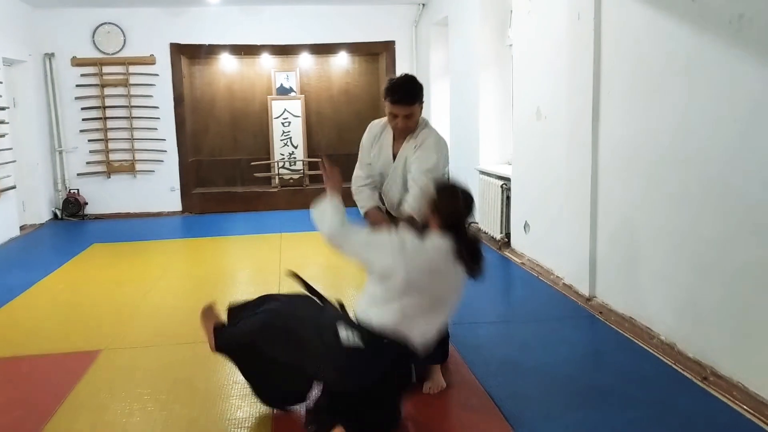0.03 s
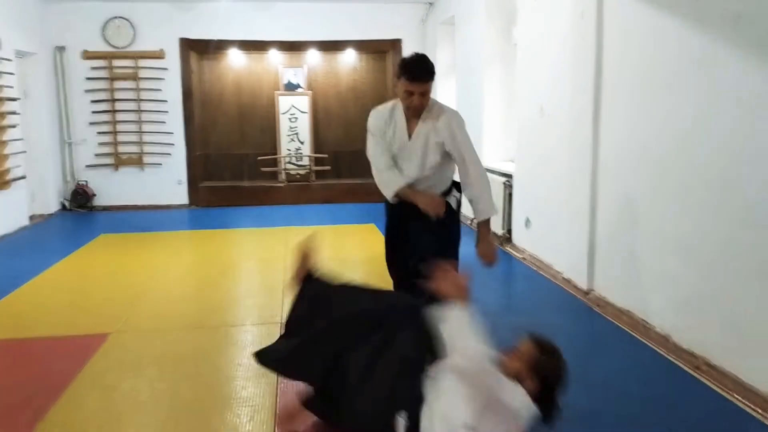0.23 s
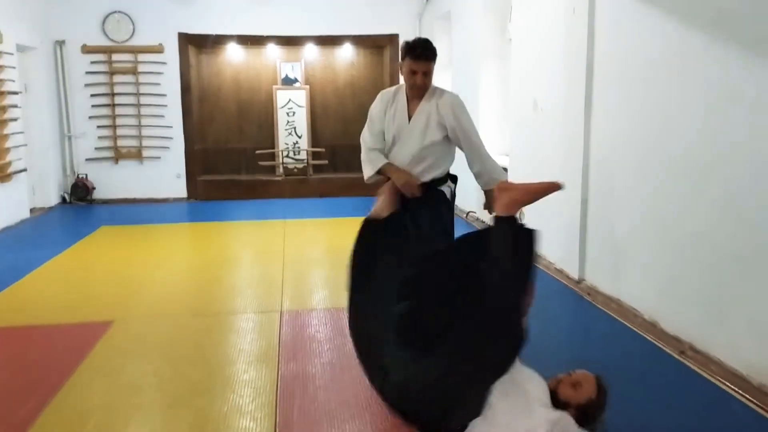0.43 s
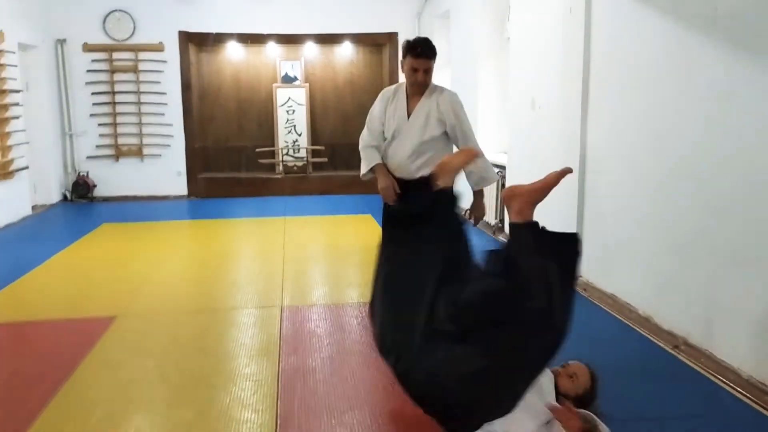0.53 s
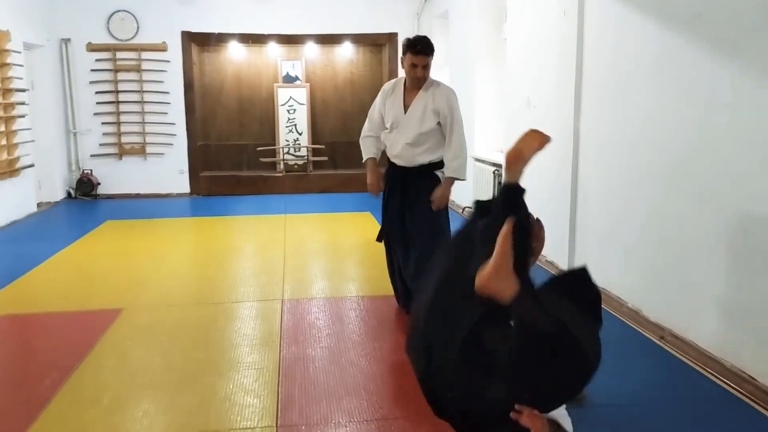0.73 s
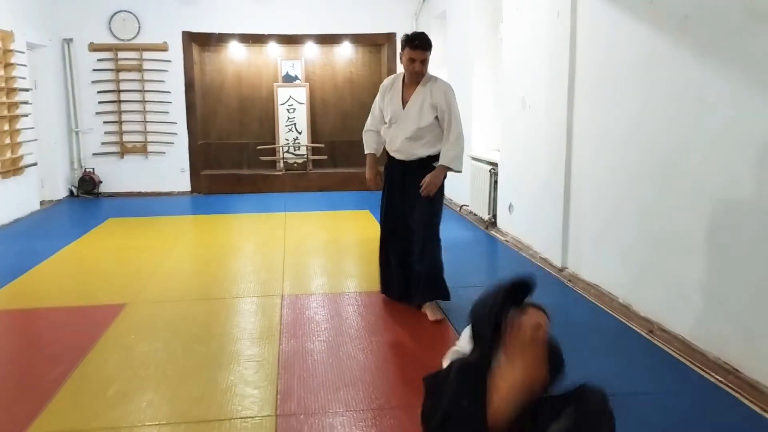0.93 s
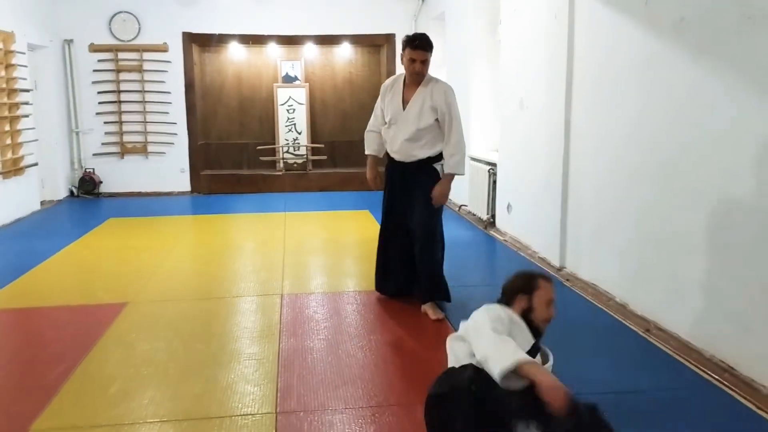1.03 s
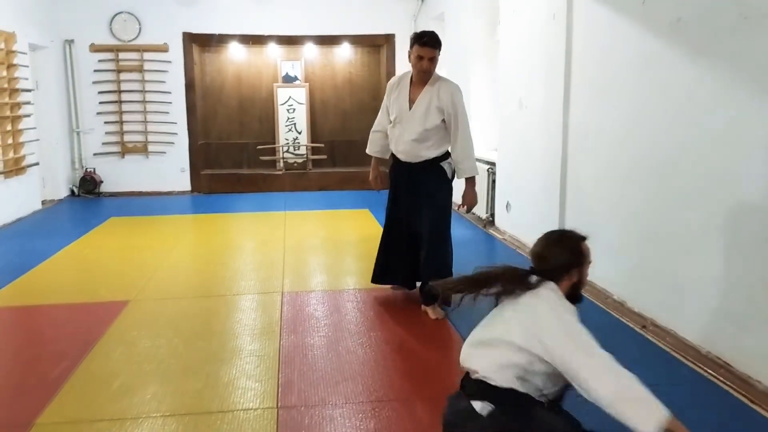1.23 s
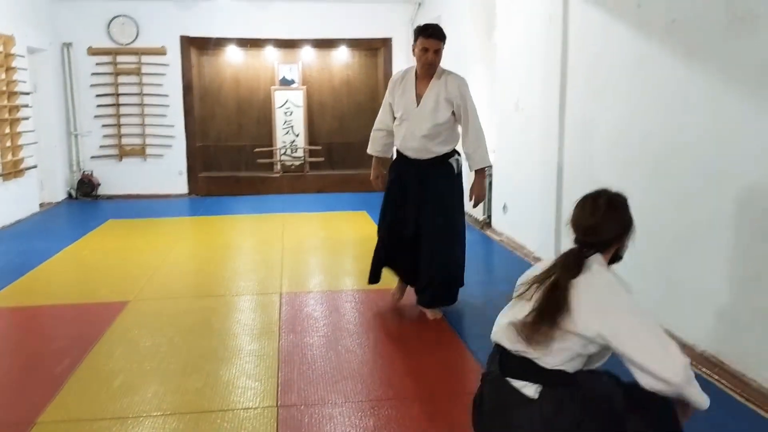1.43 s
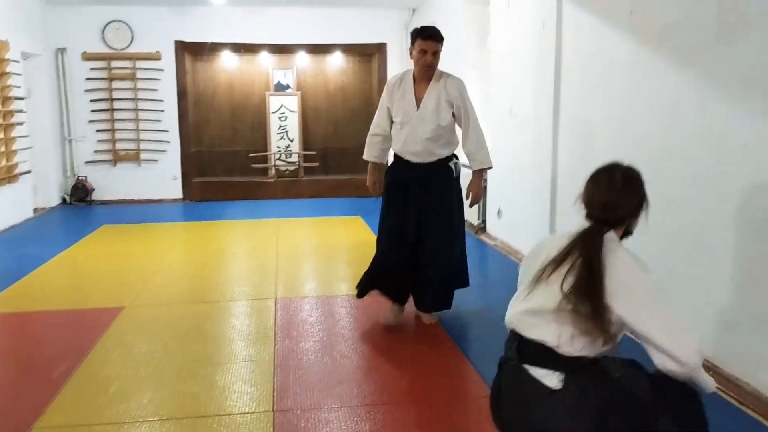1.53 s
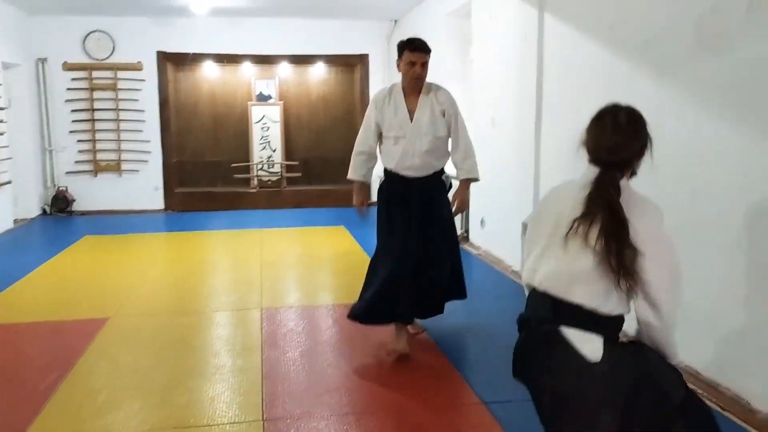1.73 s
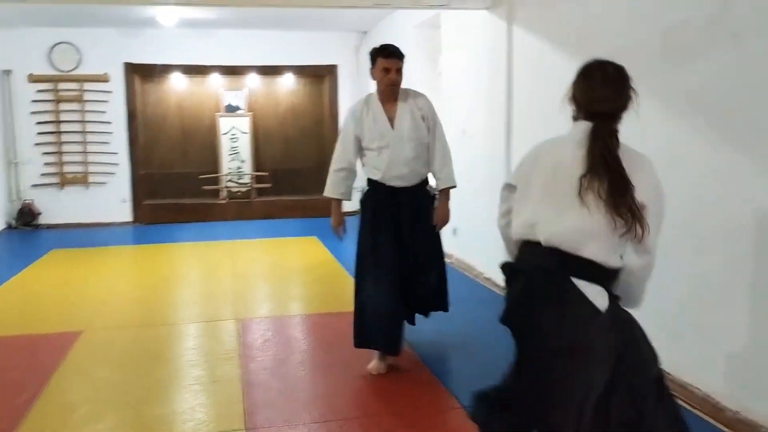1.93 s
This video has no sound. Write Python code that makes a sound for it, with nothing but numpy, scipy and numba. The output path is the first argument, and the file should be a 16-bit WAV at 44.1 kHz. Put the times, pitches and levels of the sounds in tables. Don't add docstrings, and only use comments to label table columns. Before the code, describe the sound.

Breakfall on a mat in a long bare-walled hall, close to a phone: a softer thump, a sharp, slightly clipped slap with quick wall echoes, a boomy decay, faint rolling and cloth rustle, then a small foot scuff.

```python
import sys
import numpy as np
from scipy import signal
from scipy.fft import rfft, irfft
from scipy.io import wavfile
from scipy.ndimage import uniform_filter1d
from numba import njit

SR = 44100
rng = np.random.default_rng(int(sys.argv[2]) if len(sys.argv) > 2 else 0)


def transcribe(signal):
    frames = np.atleast_2d(signal).T
    limited = np.clip(frames, -1, 1)
    pcm = np.round(limited * 32767).astype(np.int16)
    wavfile.write(sys.argv[1], SR, pcm)


def volts_from_decibels(level):
    exponent = np.asarray(level, float) / 20
    return 10 ** exponent


N = 88200
T = np.arange(N) / SR
HZ = np.maximum(np.arange(N + 1) * SR / (2 * N), 1)
FALL_S, SLAP_S = 0.113, 0.466

# pitch_hz, level_db_per_hz
AIR_COLOUR = [(25, -8), (70, -2.5), (240, -4.5), (600, -9.5), (900, -8), (3000, -13.5), (7000, -20),
              (16000, -32.5)]
# start_s, level_db, contact_s
MAT_PUSHES = [
    (0.1091, -25, 0.0017),
    (0.1122, -6, 0.0023),
    (0.118, -6, .0024),
    (0.129, -3, 0.004),
    (0.4605, -4, 0.00046),
    (0.4663, 8, 0.0019),
    (.4935, 6.5, 0.0014),
    (.505, 7, 0.0013),
]
# pitch_hz, level_db, t60_s
MAT_MODES = [(144.3, -5, 0.17), (221, 4.5, 0.11), (271, 3, 0.12), (323, 3, 0.067), (450, -6, 0.086),
             (900, -10, .012)]
# start_s, level_db
FALL_CRACKS = [
    (.1149, -9.5),
    (.1183, -9),
    (.1202, -9.5),
    (.1243, -11.5),
    (.130, -16),
    (.137, -16),
    (.148, -21),
]
# start_s, level_db
SLAP_CRACKS = [(.4605, -25), (.4668, 10), (.4712, 4.5), (.474, 2.5), (.4765, 4), (.4806, 4), (.4828, -2),
               (.490, -9), (.494, -24), (.4975, 7), (.502, -2), (.5135, -5), (.523, -4), (.548, -1)]
# pitch_hz, level_db_per_hz
FALL_CRACK_COLOUR = [(300, -25), (600, -3), (1400, -2), (2500, 1), (3600, -14.5), (5500, -8.5),
                     (12000, -13), (16000, -39)]
SLAP_CRACK_COLOUR = [(300, -28), (700, -2.5), (1500, -2), (3300, -16.5), (5200, 2.5), (7000, -6.5),
                     (10000, -27.5), (14500, -9)]
# pitch_hz, level_db_per_hz
FALL_RING_COLOUR = [(30, -47), (60, -14.5), (150, -8), (260, -3.5), (420, -20), (1500, -21), (6500, -32.5),
                    (16000, -42)]
SLAP_RING_COLOUR = [(35, -29.5), (130, -7.5), (270, 1), (390, -6), (600, -9.5), (1600, -21), (6500, -20.5),
                    (16000, -36)]
# pitch_hz, t60_s
HALL_DECAY = [(60, 2.33), (200, 1.374), (500, 1.54), (1500, 1.42), (5000, 1.266), (9000, 0.79),
              (14000, 0.35)]
# pitch_hz, fall_level_db, slap_level_db, t60_s
ROOM_MODES = [(66, -35, -29.5, 3.1), (103, -27, -29, 2.56), (139.4, -37, -18, 1.72),
              (167, -23, -18.5, 1.54), (205, -29, -16, 1.08), (216.6, -24, -19, 1.4),
              (251.6, -25, -22, 1.57), (295, -32, -21, 1.02), (454, -39, -25.5, 1.97),
              (507, -59, -28.5, 2.7)]
# start_s, level_db
TICKS = [
    (.1104, -31),
    (.4605, -19),
    (1.2105, -38),
    (1.676, -53),
    (1.911, -47),
]
# pitch_hz, level_db_per_hz
TICK_COLOUR = [(400, -8), (1400, 0), (3000, -8), (7000, -13), (10000, -20), (16000, -30)]
# peak_s, level_db, rise_s, fall_s, extra_treble_db
SWISHES = [
    (.32, -45, .05, 0.034, 4),
    (1.0, -49.5, 0.13, 0.14, 4.5),
    (1.225, -50, 0.015, 0.063, -4),
    (1.46, -53, 0.055, .04, -3),
    (1.555, -57, 0.058, 0.082, 8.5),
    (1.73, -60, .02, 0.034, 8),
    (1.9, -72, .1, .03, -3),
]
# pitch_hz, level_db_per_hz
CLOTH_COLOUR = [(500, -25), (1500, 10), (3000, 1.5), (7000, -4.5), (9000, -6.5), (12000, -12), (16000, -19)]
# peak_s, level_db, rise_s, fall_s
ROLLS = [
    (0.771, -20, 0.022, 0.037),
    (1.0, -26.5, 0.035, 0.09),
    (1.5, -46.5, 0.06, 0.054),
]
# pitch_hz, level_db_per_hz
ROLL_COLOUR = [(30, -23), (100, -8.5), (170, 0), (260, 0), (400, -9), (680, -10.5), (900, -40),
               (16000, -120)]
# start_s, level_db
SLIPS = [
    (1.6955, -2),
    (1.7026, 4.5),
    (1.7142, 0),
    (1.7275, -2),
    (1.733, -2),
]
# pitch_hz, level_db_per_hz
SCUFF_COLOUR = [(1500, -36), (2800, -12), (3400, -5.5), (5000, -9), (7500, -5), (11000, -10.5),
                (15000, -16)]
# pitch_hz, width_hz, level_db
SQUEAKS = [(4980, 330, 7), (7400, 600, 2.5), (3660, 500, -6), (10400, 900, 0)]
# pitch_hz, gain_db
MIC_COLOUR = [(20, -23), (55, -2), (690, -1), (760, -6.5), (3200, -6), (4200, -3), (8100, 0.5), (8600, -5)]


def read(table, hz):
    columns = np.array(table)
    return np.interp(np.log(hz), np.log(columns[:, 0]), columns[:, 1])


def unit(x):
    return x / np.sqrt(np.mean(x ** 2))


def colour(x, db):
    cepstrum = irfft(np.log(unit(volts_from_decibels(db))))
    cepstrum[1:N] *= 2
    cepstrum[N + 1:] = 0
    return irfft(rfft(x, 2 * N) * np.exp(rfft(cepstrum)))[:N]


def noise():
    return rng.standard_normal(N)


def since(start):
    return np.maximum(T - start, 0)


def fade(start, t60):
    return (T >= start) * volts_from_decibels(-60 * since(start) / t60)


def swell(peak, db, rise, fall):
    return volts_from_decibels(db) * np.exp(-((T - peak) / np.where(T < peak, rise, fall)) ** 2)


def bumps(rate_hz):
    hold = int(SR / rate_hz)
    steps = np.repeat(rng.standard_normal(N // hold + 1), hold)
    return unit(uniform_filter1d(steps, hold)[:N])


def lowpass(x, order, hz):
    return signal.sosfilt(signal.butter(order, hz, fs=SR, output="sos"), x)


@njit
def follow(x, up, down):
    y, level = np.empty(len(x)), 0.
    for i in range(len(x)):
        level += (abs(x[i]) - level) * (up if abs(x[i]) > level else down)
        y[i] = level
    return y


def air():
    level_db = -49.5 - 3.5 * T / 2 + 0.58 * bumps(6.5)
    return volts_from_decibels(level_db) * colour(noise(), read(AIR_COLOUR, HZ))


def thumps():
    push = sum(volts_from_decibels(db) * np.sin(np.pi * np.clip((T - s) / contact, 0, 1)) for s, db, contact in MAT_PUSHES)
    ring = sum(volts_from_decibels(db) * np.cos(2 * np.pi * hz * T) * fade(0, t60) for hz, db, t60 in MAT_MODES)
    return irfft(rfft(push, 2 * N) * rfft(ring, 2 * N))[:N] / (0.0058 * SR)


def cracks(table, tone):
    burst_s = 0.00066
    dull_db_per_s_khz, bright_hz = 29, 8700
    bursts = sum(volts_from_decibels(db) * fade(s, np.log(1000) * burst_s) for s, db in table)
    x = colour(bursts * np.sign(noise()), read(tone, HZ))
    low = lowpass(x, 3, bright_hz)
    treble_db = -8 * dull_db_per_s_khz * since(table[0][0] + 0.006)
    return low + (x - low) * volts_from_decibels(treble_db)


def hall(start, db, tone):
    build_s, build_cycles = 0.011, 0.54
    early_db, early_t60_s = 1.5, 0.27
    spectrum = rfft(colour(noise(), read(tone, HZ)), 2 * N)
    early = 1 + volts_from_decibels(early_db) * fade(start, early_t60_s)
    out = 0
    for hz in 25 * 2 ** (np.arange(30) / 3):
        thirds_away = np.clip(3 * np.log2(HZ / hz), -1, 1)
        band = irfft(spectrum * np.cos(np.pi / 2 * thirds_away) ** 2)[:N]
        rise = 1 - np.exp(-since(start) / (build_s + build_cycles / hz))
        out = out + band * rise * fade(start, read(HALL_DECAY, hz)) * early
    return volts_from_decibels(db) * out


def deep():
    beat_hz, lag_s, rise_s = 5.93, 0.022, 0.019
    twin = (ROOM_MODES[0][0] + beat_hz,) + tuple(ROOM_MODES[0][1:])
    out = 0
    for hz, fall_db, slap_db, t60 in ROOM_MODES + [twin]:
        for s, db in ((FALL_S, fall_db), (SLAP_S, slap_db)):
            tone = np.sin(2 * np.pi * hz * (T - s - lag_s))
            out = out + volts_from_decibels(db) * tone * fade(s, t60) * np.clip((T - s) / rise_s, 0, 1)
    return out


def ticks():
    bursts = sum(volts_from_decibels(db) * fade(s, 0.013) for s, db in TICKS)
    return colour(bursts * np.sign(noise()), read(TICK_COLOUR, HZ))


def cloth():
    grain = volts_from_decibels(2.0 * bumps(150))
    x = colour(grain * noise(), read(CLOTH_COLOUR, HZ))
    low = lowpass(x, 2, 8600)
    return sum(swell(s, db, rise, fall) * (low + volts_from_decibels(treble_db) * (x - low))
               for s, db, rise, fall, treble_db in SWISHES)


def roll():
    return sum(swell(*row) for row in ROLLS) * colour(noise(), read(ROLL_COLOUR, HZ))


def scuff():
    start_s, hold_s, t60_s = 1.696, 0.035, 0.11
    level_db, bed_db, ring_db = -46.5, -8.5, -1
    onset = np.clip((T - start_s) / 0.005, 0, 1)
    bed = onset * volts_from_decibels(bed_db + 2.48 * bumps(300)) * volts_from_decibels(-60 * since(start_s + hold_s) / t60_s)
    slips = bed + sum(volts_from_decibels(db) * fade(s, 0.026) for s, db in SLIPS)
    peaks = 1 + sum(2.5 * volts_from_decibels(db) / (1 + (2 * (HZ - hz) / width) ** 2) for hz, width, db in SQUEAKS)
    tone_db = read(SCUFF_COLOUR, HZ)
    near = colour(slips * noise(), tone_db + 20 * np.log10(peaks))
    far = colour(onset * fade(start_s, 1.0) * noise(), tone_db - 0.5 * HZ / 1000)
    return volts_from_decibels(level_db) * (near + volts_from_decibels(ring_db) * far)


def scene():
    blows = thumps() + cracks(FALL_CRACKS, FALL_CRACK_COLOUR) + cracks(SLAP_CRACKS, SLAP_CRACK_COLOUR)
    ring = hall(FALL_S, -18, FALL_RING_COLOUR) + hall(SLAP_S, -4.5, SLAP_RING_COLOUR) + deep()
    movement = ticks() + cloth() + roll() + scuff()
    return (air() + blows + ring + movement)[None]


def low_pass(x):
    return signal.sosfilt(signal.butter(12, 17180, fs=SR, output="sos"), x)


def record(dry):
    limit_db, ratio, attack_s, release_s = -18, 1.757, 0.0026, 0.12
    hush_s, hush_db = 1.935, -4.5
    clip, clip_edge = 0.7, 12
    x = colour(dry[0], read(MIC_COLOUR, HZ) - 50 * np.clip((HZ - 16000) / 200, 0, 1))
    level = follow(x, 1 / (attack_s * SR), 1 / (release_s * SR))
    x = x * np.minimum(volts_from_decibels(limit_db) / (level + 1e-9), 1) ** (1 - 1 / ratio)
    x = x[None] * volts_from_decibels(hush_db * np.clip((T - hush_s) / 0.013, 0, 1))
    x = x / (1 + np.abs(x / clip) ** clip_edge) ** (1 / clip_edge)
    return low_pass(x)


dry = scene()
out = record(dry)
transcribe(out)
```